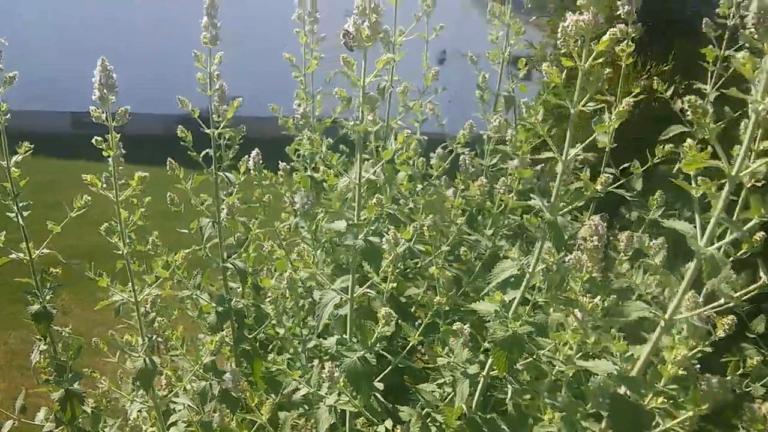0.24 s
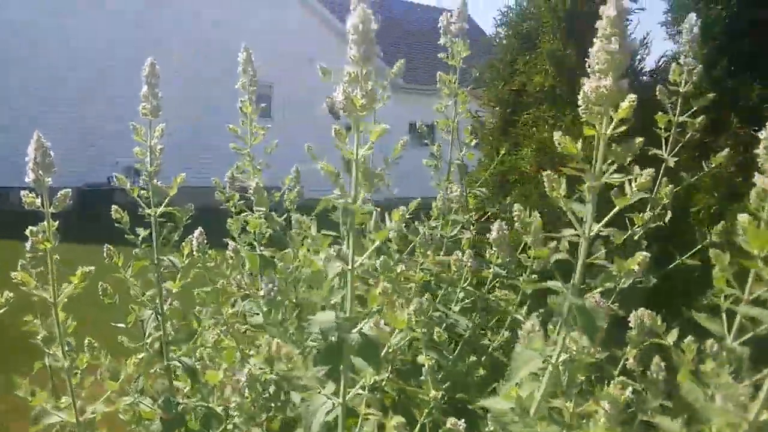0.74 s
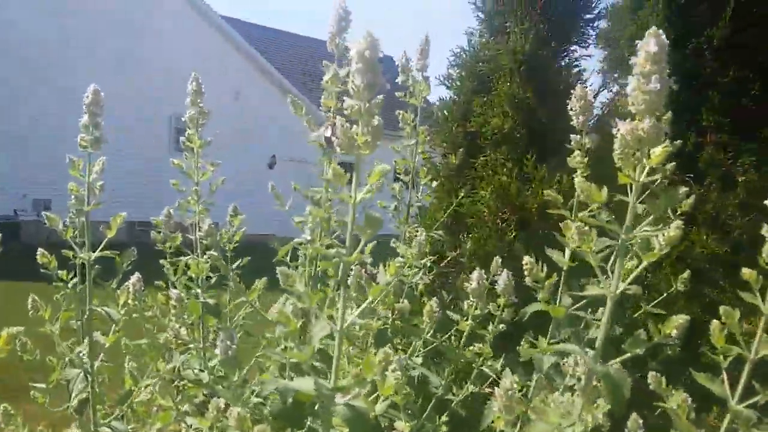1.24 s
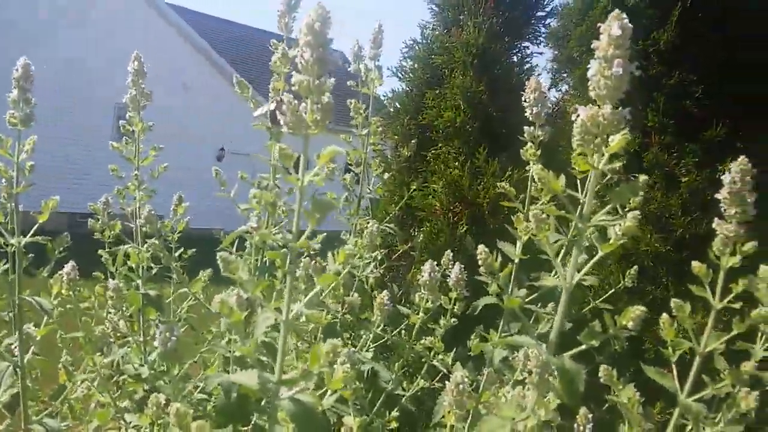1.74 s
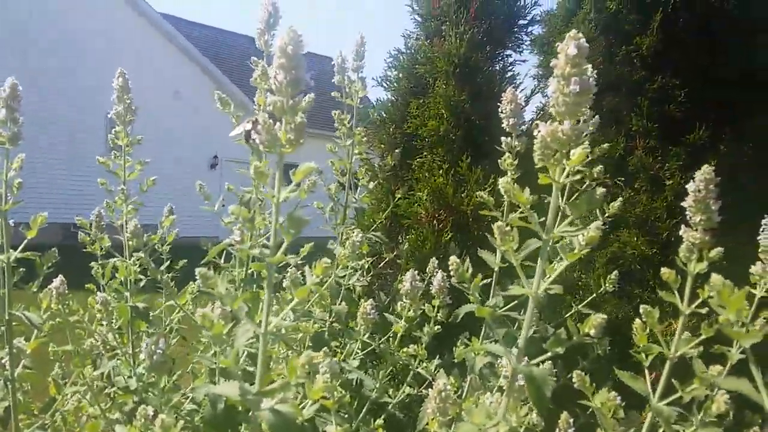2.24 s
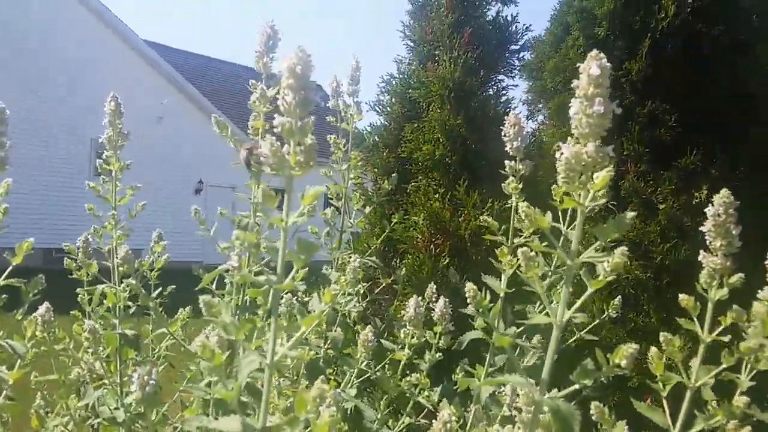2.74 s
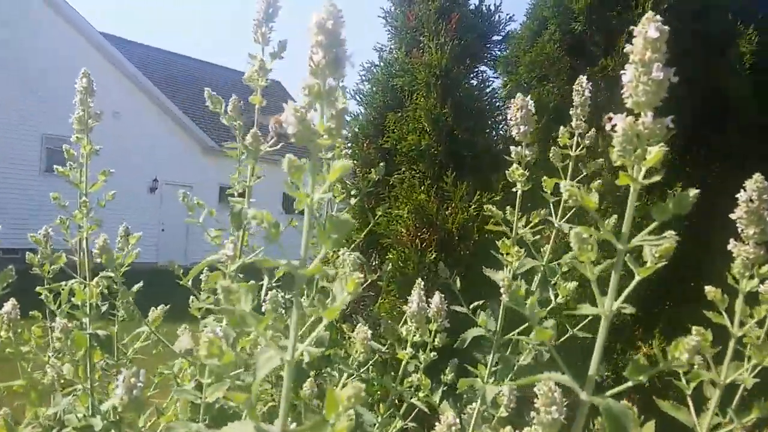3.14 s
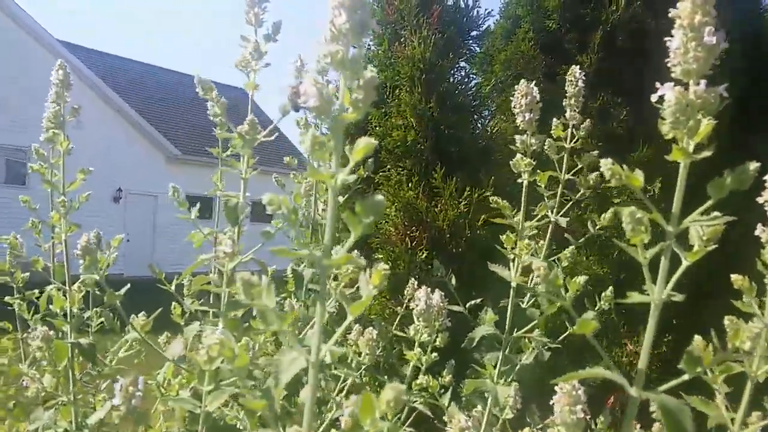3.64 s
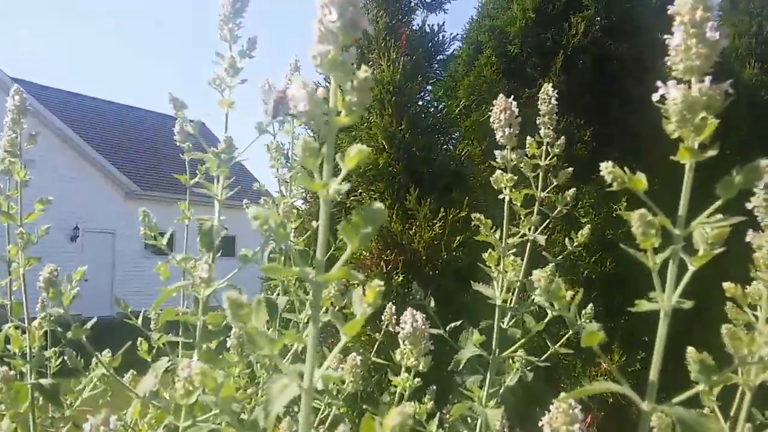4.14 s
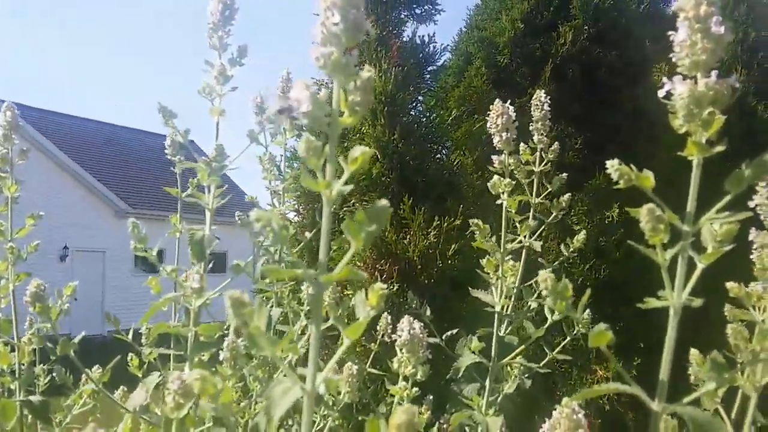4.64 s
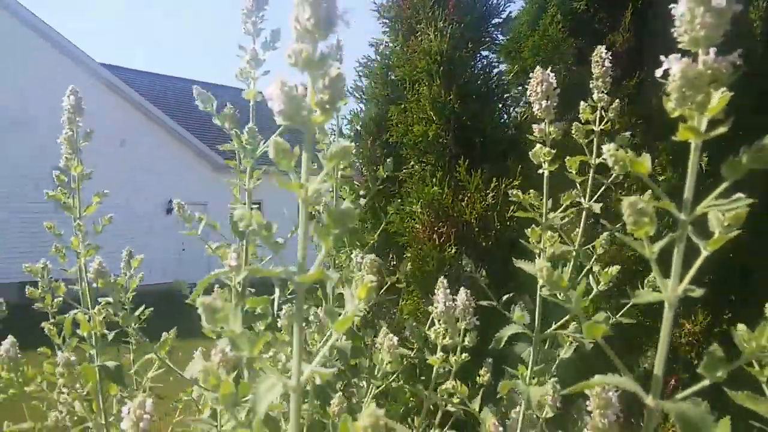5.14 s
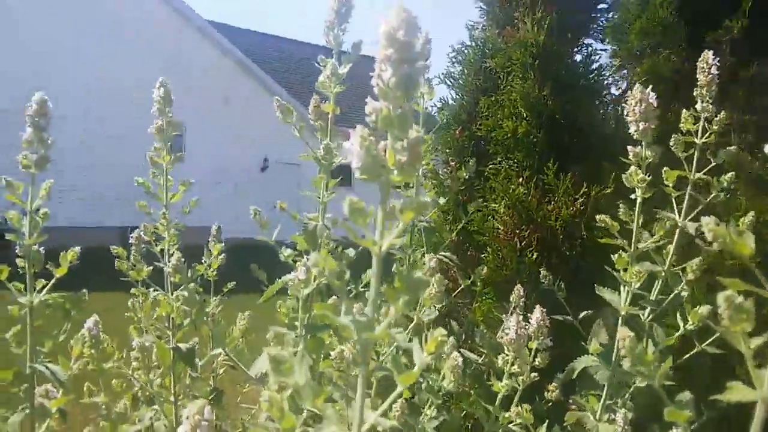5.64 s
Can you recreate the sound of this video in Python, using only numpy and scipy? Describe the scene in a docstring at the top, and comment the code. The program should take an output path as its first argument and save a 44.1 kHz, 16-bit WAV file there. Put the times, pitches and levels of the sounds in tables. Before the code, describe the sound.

Outdoors by flowering plants and a house, a steady airy rush opens loud, then quickly becomes faint over a distant engine's low, wavering drone. Short falling sparrow chirps repeat at middle distance, lightly echoing. Faint insects trill from the lawn. Right at the microphone, skin hisses and the case clicks sharply, ending with a rough scrape and a strong tick around five seconds.

```python
"""A broad machine-like rush is loud at first, then suddenly much fainter, over the low hum of an air conditioner
and a far engine. Sparrows chirp with echoes in a sunny yard, and far insects sound faintly from the lawn.
Fingers creep over the hand-held phone: a thin hiss, sharp case ticks and one loud scrape close by.
Rush, murmur, insects and skin are filtered noise; engine, hum and birds are tones on moving pitches;
the case is struck by impulses and answers with decaying modes."""
import sys
import numpy as np
from scipy import signal
from scipy.fft import rfft, irfft, next_fast_len
from scipy.io import wavfile

SR = 44100
rng = np.random.default_rng(int(sys.argv[2]) if len(sys.argv) > 2 else 0)


def materialize(psi):
    """Save the field psi as 16-bit PCM at rate SR to the path in sys.argv[1].

    A 1-D psi becomes a single channel; in a 2-D psi each row is a channel.
    """
    bounded = np.clip(np.atleast_2d(psi).T, -1, 1)
    quanta = np.round(bounded * 32767).astype(np.int16)
    wavfile.write(sys.argv[1], SR, quanta)


N = 259297
T = np.arange(N) / SR  # time, s

# Far engine's surging level: start_s, level_db
ENGINE_LEVEL = [(0.0, -53.5), (0.31, -39), (0.44, -48), (0.59, -40), (0.75, -42), (0.8, -46), (0.85, -42.5),
                (1.01, -38), (1.1, -48), (1.31, -43.5), (1.49, -59), (1.57, -45), (2.21, -61.5),
                (2.31, -45.5), (2.6, -56.5), (2.83, -42.5), (3.03, -60), (3.13, -43.5), (3.24, -55.5),
                (3.57, -44), (5.36, -49), (5.48, -79), (5.68, -42.5), (5.88, -59)]
# The broad rush is loud at first, then drops quickly, and its faint remainder fades slowly
RUSH_DB, RUSH_DROP_DB, RUSH_FADE_DB_PER_S = -43, 12.5, 8.5
LOUD_ENDS_S, DROP_LASTS_S = 1.283, 0.24


def undb(db):
    """Level and amplitude: 20 dB is a factor of ten in gain."""
    return 10 ** (np.asarray(db) / 20)


def curve(rows, axis=1):
    """Linear interpolation: one column of a table joined by straight lines in time."""
    rows = np.asarray(rows, float)
    rows = rows.reshape(-1, rows.shape[-1])
    return np.interp(T, rows[:, 0], rows[:, axis])


def unit(x):
    """Normalization of the mean power: scale to rms 1."""
    return x / np.sqrt(np.mean(x ** 2))


def noise():
    """White noise: independent samples carry equal mean power at every frequency."""
    return rng.standard_normal(N)


def walk(rate):
    """Gaussian low-pass of noise: a smooth drift of rms 1, changing about rate times a second."""
    size = next_fast_len(N, real=True)
    hz = np.arange(size // 2 + 1) * SR / size
    spectrum = rfft(rng.standard_normal(size)) * np.exp(-(hz / rate) ** 2)
    return unit(irfft(spectrum, size)[:N])


def colour(x, points):
    """Minimum-phase filtering: a causal response of unit energy through (hz, relative_db) points."""
    size = 8192
    hz, db = np.transpose(points)
    grid = np.maximum(np.arange(size // 2 + 1) * SR / size, 1)
    cepstrum = irfft(np.log(undb(np.interp(np.log(grid), np.log(hz), db))))
    # folding the cepstrum onto positive times makes the response causal
    cepstrum[1:size // 2] *= 2
    cepstrum[size // 2 + 1:] = 0
    response = irfft(np.exp(rfft(cepstrum)))
    return signal.fftconvolve(x, response / np.linalg.norm(response))[:N]


def band(hz, width):
    """Resonance: noise through two equal resonators in cascade, rms 1."""
    b, a = signal.iirpeak(hz, hz / width, fs=SR)
    once = signal.lfilter(b, a, noise())
    return unit(signal.lfilter(b, a, once))


def sine(hz):
    """Phase is the integral of frequency: a tone of rms 1 on a moving pitch."""
    return np.sqrt(2) * np.sin(2 * np.pi * (np.cumsum(hz) / SR + rng.random()))


def add(out, start, x):
    """Superposition: mix x into out at a time in seconds."""
    i = max(int(start * SR), 0)
    out[i:i + len(x)] += x[:N - i]


def loud_opening():
    """Linear ramp: 1 during the loud opening, falling to 0 as the sound grows faint."""
    return np.clip(1 - (T - LOUD_ENDS_S) / DROP_LASTS_S, 0, 1)


def rush_level():
    """Piecewise-linear level in dB: loud at first, then a quick drop and a slow steady fade."""
    slow_fade = RUSH_FADE_DB_PER_S * np.maximum(T - LOUD_ENDS_S, 0)
    return RUSH_DB - RUSH_DROP_DB * (1 - loud_opening()) - slow_fade


def surge():
    """Level modulation: how far the engine is above or below its mean level, in dB."""
    level = curve(ENGINE_LEVEL)
    return level - level.mean()


def broad_rush(dulling=0.94):
    """Filtered broadband noise, whose treble falls further than its bass as it grows faint."""
    # Spectrum of the rush: hz, relative_db
    rush_colour = [(120, -32.5), (200, 0.5), (232, -11.5), (311, -12), (349, -16), (379, -10.5),
                   (629, -13.5), (765, -10.5), (1380, -10), (2980, -20.5), (5030, -25), (7570, -38.5),
                   (10000, -77), (13000, -65), (22000, -120)]
    rush = unit(colour(noise(), rush_colour))
    level = rush_level()
    high_pass = signal.butter(2, 3500, "high", fs=SR, output="sos")
    treble = signal.sosfiltfilt(high_pass, rush)
    dulled = rush - treble + treble * undb(dulling * (level - level.max()))
    return dulled * undb(level + 0.5 * walk(9.1))


def murmur():
    """Distant noise summed with resonances that waver independently under one common envelope."""
    # Spectrum of the murmur: hz, relative_db
    yard_colour = [(150, -9), (260, -3.5), (350, -3.5), (480, -6), (640, -6), (800, -0.5), (1000, -5.5),
                   (1150, -9.5), (1500, -6.5), (2100, -15.5), (2600, -13.5), (3900, -21.5), (4900, -27),
                   (9000, -48)]
    # Resonances in the distant noise: centre_hz, width_hz, level_db relative to the envelope
    yard_bands = [(802, 205, -5.5), (992, 51, -10.5), (1540, 310, -10.5)]
    # Common envelope: start_s, level_db
    envelope = [(0, -49.5), (1.25, -56), (1.5, -58), (3.05, -55.5), (3.5, -52), (4.8, -53.5), (5.2, -49),
                (5.48, -55.5), (5.88, -51)]
    distant = unit(colour(noise(), yard_colour)) * undb(-2.5 + walk(20.0))
    for hz, width, db in yard_bands:
        distant = distant + band(hz, width) * undb(db + walk(30.0))
    return distant * undb(curve(envelope))


def rumble(faint_db=-51.0, lift_db=6, shared=0.27):
    """Low-frequency noise under level modulation: louder in the opening, swelling with the engine."""
    # Spectrum of the rumble: hz, relative_db
    rumble_colour = [(25, -33), (38, -38), (52, -4), (72, 1), (120, 6), (145, 0), (175, -3.5), (200, -1),
                     (255, -4.5), (320, -17.5), (600, -64)]
    level = faint_db + lift_db * loud_opening() + shared * surge() + 1.1 * walk(13.0)
    return unit(colour(noise(), rumble_colour)) * undb(level)


def engine(firing_db=-1.0, blur_db=-11, blur_width_hz=45, drone_hz=165, drone_width_hz=14, shared=0.22):
    """Periodic firing and resonance: a blurred firing tone and one drone surge and fade far away."""
    # Firing rate before its small random drift: start_s, pitch_hz
    firing_rate = [(0, 102.3), (3.25, 105.7), (3.6, 103), (4.95, 98.5), (5.25, 104.3), (5.88, 110)]
    # Low drone before surging and a 3 dB cut: start_s, level_db
    drone_level = [(0, -41), (0.5, -44.5), (1.25, -52), (2.1, -49), (3.0, -55), (3.35, -48.5), (3.7, -63),
                   (4.5, -53.5), (5.88, -56)]
    pitch = curve(firing_rate)
    firing = sine(pitch * (1 + 0.0073 * walk(9.5))) * undb(firing_db + 2 * walk(9.4))
    blur = band(np.mean(pitch), blur_width_hz) * undb(blur_db)
    drone = band(drone_hz, drone_width_hz) * undb(curve(drone_level) + shared * surge() - 3.0)
    return (firing + blur) * undb(curve(ENGINE_LEVEL)) + drone


def compressor(shaft_hz=58.63, hum_db=-58.5, hum_lift_db=7.5, shared=0.13, whine_db=-5):
    """Harmonics of rotation: air-conditioner lines on shaft multiples, each wavering in level."""
    # Hum lines: shaft_multiple
    hum_orders = [2, 4, 6]
    # Hum lines: level_db relative to the hum
    hum_lines = [-7, 1, -9]
    # High whines: shaft_multiple
    whine_orders = [17, 23, 34, 41, 42, 46, 48, 56, 83, 85]
    # High whines: level_db relative to the whine level
    whine_lines = [-14, -11, -42, -20.5, -15, -30, -41, -18, -21.5, -23]
    shaft = shaft_hz * (1 + 0.00052 * walk(8.6))
    hum = sum(sine(k * shaft) * undb(db + 2 * walk(13)) for k, db in zip(hum_orders, hum_lines))
    whine = sum(sine(k * shaft) * undb(db + 2 * walk(16.0)) for k, db in zip(whine_orders, whine_lines))
    hum_level = hum_db + hum_lift_db * loud_opening() + shared * surge()
    # the whines follow the level of the broad rush
    return hum * undb(hum_level) + whine * undb(rush_level() + whine_db)


def insects(trill_hz=2760, trill_width_hz=300, whine_hz=5157, whine_width_hz=50):
    """Narrow-band noise: a faint blurred trill and a thin whine from the lawn."""
    # Far insects in the grass: start_s, trill_level_db, whine_level_db
    levels = [(0, -130, -94), (2.2, -69, -98), (2.5, -76, -80), (3.1, -93, -83), (4.3, -96, -76),
              (5.28, -65.5, -82), (5.88, -69.5, -89)]
    trill = band(trill_hz, trill_width_hz) * undb(curve(levels) + 1.1 * walk(25))
    return trill + band(whine_hz, whine_width_hz) * undb(curve(levels, axis=2))


def pressure(length, release, attack_share=0.31, bite=0.19, trail_db=-23, trail_decay=1):
    """Contact envelope: bite, swell, hold and release with a light trail; times as shares of length."""
    u = T[:SR // 2] / length
    past = np.maximum(u - 1, 0)
    attack = np.minimum(bite + (1 - bite) * u / attack_share, 1)
    trail = undb(trail_db) * np.exp(-past / trail_decay)
    return attack * np.maximum(np.exp(-past / release), trail)


def fingers(grain_db=1.5, catch_db=0.5, creep_db=0.72):
    """Stick-slip friction: dense slips hiss in the microphone port; rubs also shake the case."""
    # Skin creeping on the case, before creep_db and drift: start_s, level_db
    creep_level = [(0, -55), (.9, -52.5), (1.25, -55.5), (2.3, -55.5), (2.6, -56), (3.05, -55.5),
                   (3.4, -51.5), (4.3, -53.5), (4.55, -61), (4.7, -53.5), (4.87, -59), (4.96, -51.5),
                   (5.3, -55.5), (5.45, -64), (5.72, -61), (5.8, -52.5), (5.88, -60)]
    # Spectrum of the creeping hiss: hz, relative_db
    hiss_colour = [(3000, -23), (6500, -17), (8500, -13), (10000, -9), (11300, -1), (12200, -0.5),
                   (13500, -4.5), (15600, -8.5), (16300, -75)]
    # Finger rubs: start_s, length_s, level_db, body_db (case relative to the rub)
    rubs = [(0.935, 0.061, -38.5, -9), (2.763, 0.0072, -44, -29), (2.85, 0.029, -44.5, -11),
            (3.682, 0.0031, -39.5, -16.5), (3.755, 0.0024, -38, -22), (4.962, 0.015, -29, -12.5),
            (5.0013, 0.053, -17, -7.5), (5.16, 0.0036, -47.5, 7.5), (5.185, 0.043, -46.5, -5.5),
            (5.758, 0.008, -39, -26)]
    # Spectrum of the shaken case: hz, relative_db
    body_colour = [(200, -22), (600, -10), (1000, -4.5), (1400, 1), (1700, 0.5), (1980, 1.5), (2600, -2),
                   (3700, -5.5), (4400, -5), (5800, -4), (7000, -10), (8200, -14.5), (10000, -16)]
    # Spectrum of the slips in the port: hz, relative_db
    edge_colour = [(5000, -57), (8200, -28), (9000, -14), (10000, -8), (11200, 8), (12100, 7), (13200, 2.5),
                   (14300, -9), (15500, 0.5), (16400, -16)]
    edge, body = np.zeros(N), np.zeros(N)
    for start, length, db, body_db in rubs:
        add(edge, start, pressure(length, release=0.2) * undb(db))
        add(body, start, pressure(length, release=0.5) * undb(db + body_db))
    slips = unit(noise() * undb(grain_db * walk(1800)))
    # skin catches and lets go, so the case is shaken unevenly
    jolts = unit(slips * undb(catch_db * walk(190)))
    hiss = colour(noise() * undb(0.94 * walk(900)), hiss_colour)
    creep = unit(hiss) * undb(curve(creep_level) + creep_db + 0.78 * walk(25))
    return creep + colour(slips * edge, edge_colour) + colour(jolts * body, body_colour)


def sparrows(bend=1.8, echo_db=-2.0, t60=0.44, second_db=-12, flutter_db=4.0, swell=1.36):
    """Two-voiced syrinx and reverberation: gliding notes, clear or rough, scattered by walls and trees."""
    # Falling notes with after-notes: start_s, length_s, start_hz, landing_hz, level_db,
    # roughness (share of pitch), pause_s, after_hz, after_db (relative); levels before a 4.5 dB cut
    cheeps = [(0.411, 0.074, 4020, 3310, -42.5, 0.042, 0.0026, 3250, -18),
              (0.773, 0.074, 3880, 3400, -47, 0.034, 0.0018, 3300, -18),
              (1.755, 0.028, 4020, 3580, -55, 0.027, 0.0034, 3580, -6),
              (2.017, 0.083, 4670, 3320, -48.5, 0.031, 0.022, 3170, -5.5),
              (2.302, 0.047, 4030, 3900, -52, 0.053, 0.0012, 3200, -7),
              (2.836, 0.048, 4300, 3704, -52.5, 0.063, 0.002, 3600, -6),
              (3.243, 0.073, 4370, 3365, -42, 0.044, 0.001, 3140, -12.5),
              (3.516, 0.09, 4120, 3160, -57, 0.11, 0.0021, 3080, -18),
              (4.3, 0.086, 4480, 3270, -42, 0.071, 0.0033, 3610, -7),
              (4.812, 0.055, 4320, 3240, -42, 0.069, 0.0012, 3320, -4.5),
              (5.165, 0.057, 3900, 3000, -44, 0.12, 0.0023, 3000, -8),
              (5.767, 0.058, 4500, 3680, -50.5, 0.036, 0.0023, 4070, -15)]
    # Clear whistles before the same cut: start_s, length_s, start_hz, end_hz, level_db
    whistles = [(0.803, 0.09, 3430, 3150, -49.5), (0.835, 0.041, 6570, 6070, -56),
                (0.852, 0.045, 4900, 4400, -50), (1.077, 0.064, 3580, 3190, -54.5),
                (1.242, 0.13, 3650, 3680, -57.5), (1.66, 0.12, 3070, 2890, -61),
                (4.488, 0.055, 3350, 3040, -57), (5.119, 0.018, 4100, 3580, -37)]
    after_note_s, after_end = 0.0533, 0.83  # the end is a multiple of the after-note's start pitch
    whistle_dip_hz_per_s, whistle_rough = 1900, 0.0072  # longer whistles dip deeper in the middle
    song = np.zeros(N)
    wobble = walk(376)

    def along(length):
        """Normalized time: progress through a note, 0 to 1."""
        return np.linspace(0, 1, int(length * SR))

    def note(start, hz, db, rough):
        """Frequency and amplitude modulation: a wobbling note that swells and fades, with its start."""
        hz = hz * (1 + rough * np.roll(wobble, -int(start * SR))[:len(hz)])
        voice = sine(hz) + undb(second_db) * sine(hz * 1.16)
        envelope = np.abs(np.sin(np.pi * np.linspace(0, 1, len(hz)) ** swell))
        return start, voice * envelope * undb(db)

    for start, length, first_hz, last_hz, db, rough, pause, after_hz, after_db in cheeps:
        fall = last_hz + (first_hz - last_hz) * (1 - along(length)) ** bend
        after = after_hz * (1 + (after_end - 1) * along(after_note_s))
        add(song, *note(start, fall, db, rough))
        add(song, *note(start + length + pause, after, db + after_db, rough))
    for start, length, first_hz, last_hz, db in whistles:
        u = along(length)
        dip = whistle_dip_hz_per_s * length * np.sin(np.pi * u)
        hz = first_hz + (last_hz - first_hz) * u - dip
        add(song, *note(start, hz, db, whistle_rough))
    song = song * undb(flutter_db * walk(99) - 4.5)
    t = T[:SR]
    # scattered echoes begin after 12 ms and decay exponentially
    scatter = rng.standard_normal(SR) * undb(-60 * t / t60) * (t > .012)
    echo = signal.fftconvolve(song, scatter / np.linalg.norm(scatter))[:N]
    return song + undb(echo_db) * echo


def ticks(rebound_s=0.00037, rebound=0.76, snap_db=6, give_s=0.004, sag=0.78, sag_s=0.0034):
    """Impulse and modal response: the case snaps, rebounds, rings briefly and knocks hollowly."""
    # Case ticks: start_s, level_db (snap_db is added to the snap, not the ring),
    # chatter (share of the snap), knock_db, knock_hz (settled pitch)
    tick_rows = [(0.4379, -35, .15, -26.5, 350), (2.6625, -29.5, 0.1, -23, 283),
                 (2.8515, -26, .08, -42, 494), (2.883, -8, 0.24, -35.5, 480), (3.571, -27.5, .15, -35, 363),
                 (3.9747, -13, 0.15, -31.5, 530), (4.6279, -12.5, 0.12, -35, 480),
                 (5.0813, -3.5, .1, -22.5, 356), (5.104, -39, .15, -27, 330)]
    # Spectrum of the snap: hz, relative_db
    snap_colour = [(500, -4.5), (2500, -41), (4000, -21), (5300, -16), (7200, -16), (9500, -6.5),
                   (11400, 7), (13000, 2.5), (15200, 4), (16600, -12)]
    # Hollow knock: pitch_multiple, level_db relative to the knock, t60_s
    knock_modes = [(1, 1.5, 0.033), (1.62, 0, 0.021), (2.6, -7, 0.035)]
    # Brief ring of the case: pitch_hz, level_db relative to the tick, t60_s
    case_modes = [(2940, -38.5, 0.037), (3900, -31, 0.025), (5170, -31, 0.018)]
    snaps, rings = np.zeros(N), np.zeros(N)
    t = T[:SR // 10]
    case = sum(np.sin(2 * np.pi * hz * t) * undb(db - 60 * t / t60) for hz, db, t60 in case_modes)
    # the knock swells as the case gives
    swell = 1 - np.exp(-t / give_s)
    # its pitch sags as the pressure eases: time runs fast at first, then settles
    sagging = t + sag * sag_s * (1 - np.exp(-t / sag_s))
    for start, db, share, knock_db, hz in tick_rows:
        chatter = share * rng.standard_normal(len(t)) * np.exp(-t / 0.00054)
        add(snaps, start, undb(db) * (chatter + (t == 0)))
        rebound_start = start + rebound_s * rng.uniform(0.94, 1.5)
        add(snaps, rebound_start, undb(db) * np.array([rebound]))
        knock = sum(np.sin(2 * np.pi * hz * k * sagging) * undb(mode_db - 60 * t / t60)
                    for k, mode_db, t60 in knock_modes)
        add(rings, start, swell * knock * undb(knock_db) + case * undb(db))
    return colour(snaps, snap_colour) * undb(snap_db) + rings


def scene():
    """Superposition: the pressures of all sources add at one microphone."""
    yard = broad_rush() + murmur() + rumble() + engine() + compressor() + insects()
    return (yard + fingers() + sparrows() + ticks())[None]


def record(dry):
    """Band limiting: the phone cuts the top steeply with an elliptic low-pass."""
    low_pass = signal.ellip(10, .2, 80, 16400, fs=SR, output="sos")  # ripple dB, stopband dB, edge Hz
    return signal.sosfilt(low_pass, dry)


dry = scene()
out = record(dry)
materialize(out)
```